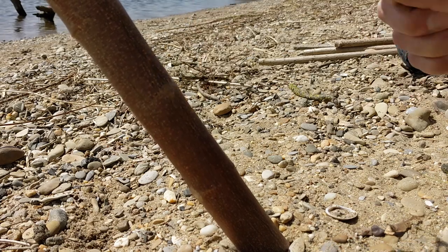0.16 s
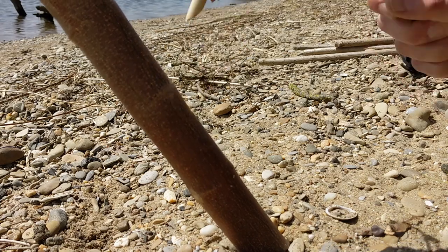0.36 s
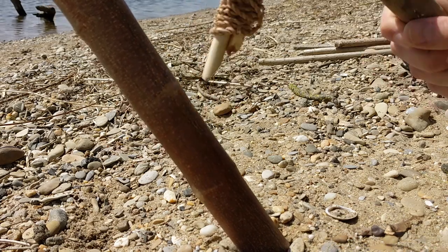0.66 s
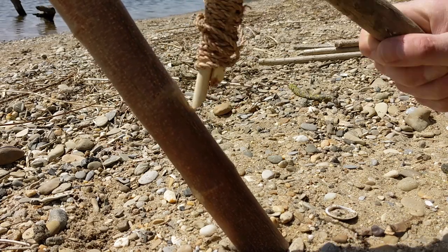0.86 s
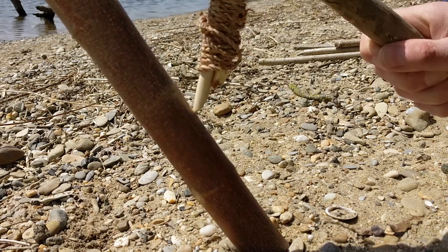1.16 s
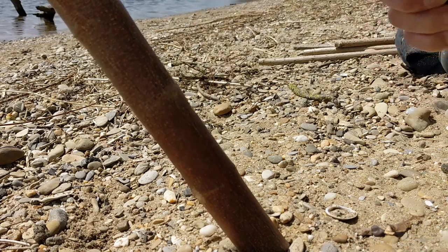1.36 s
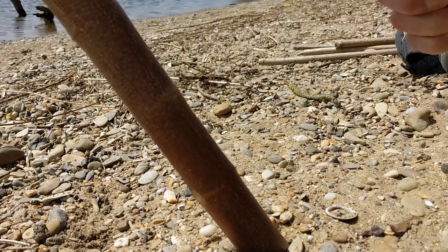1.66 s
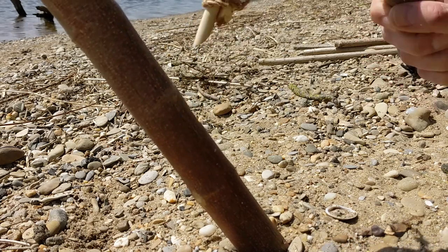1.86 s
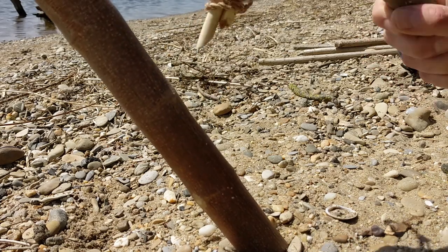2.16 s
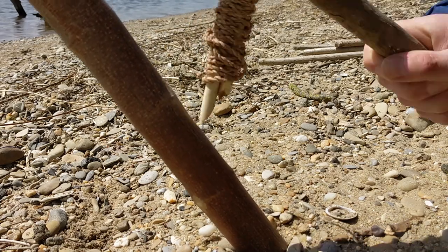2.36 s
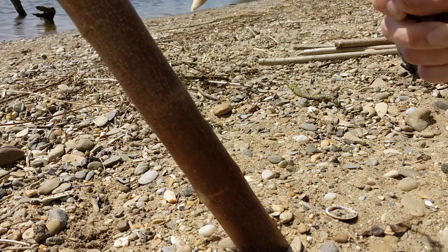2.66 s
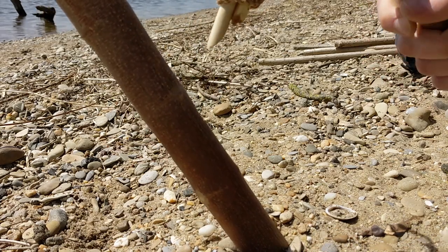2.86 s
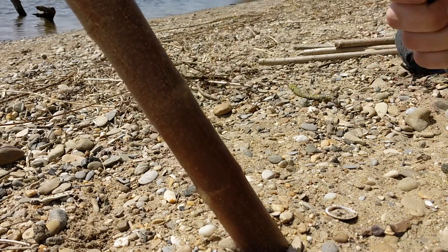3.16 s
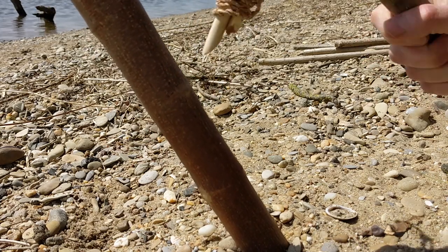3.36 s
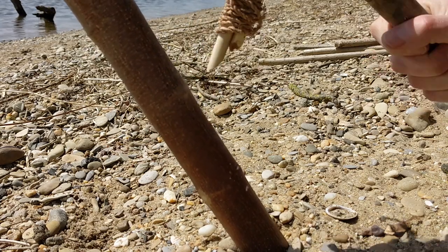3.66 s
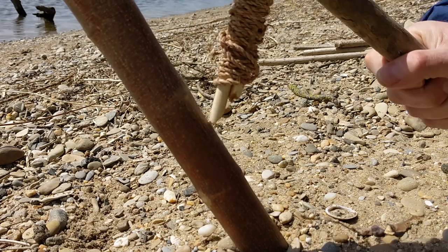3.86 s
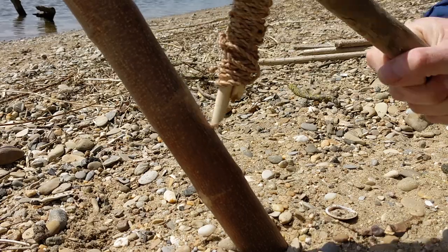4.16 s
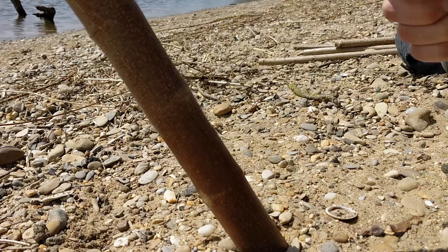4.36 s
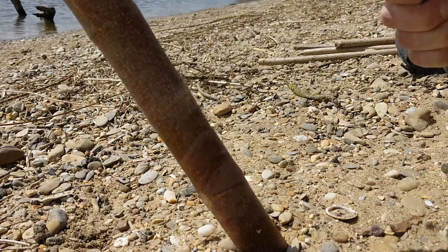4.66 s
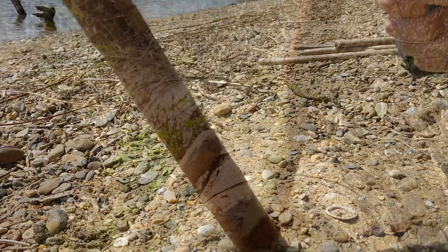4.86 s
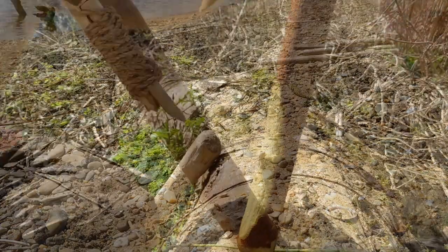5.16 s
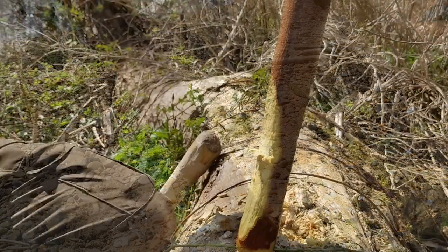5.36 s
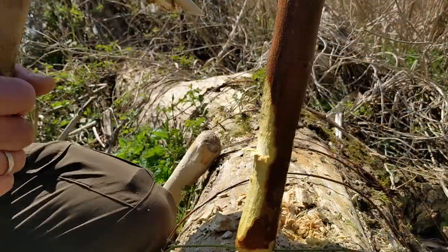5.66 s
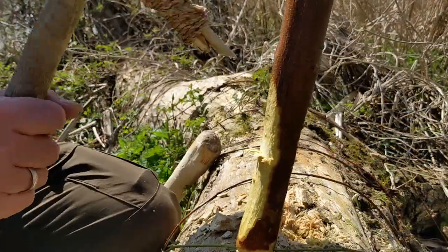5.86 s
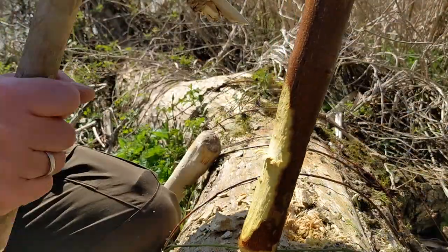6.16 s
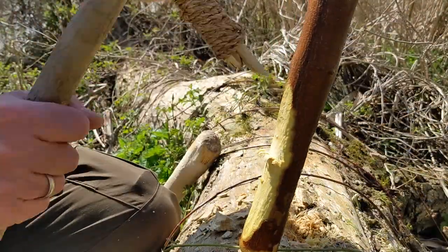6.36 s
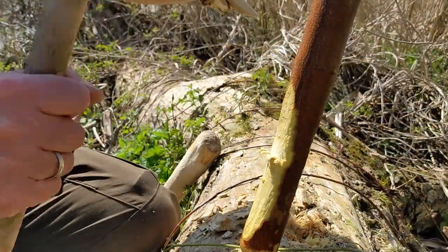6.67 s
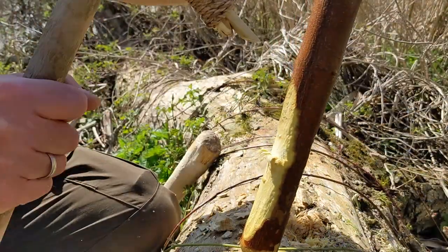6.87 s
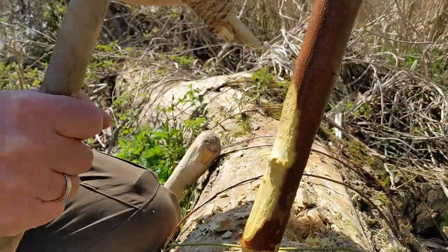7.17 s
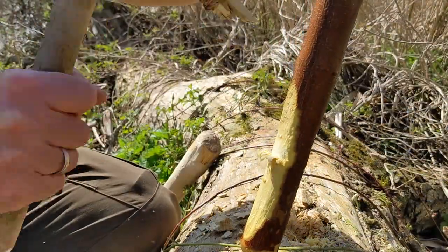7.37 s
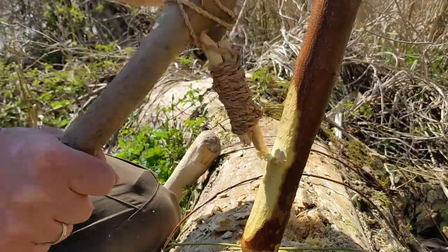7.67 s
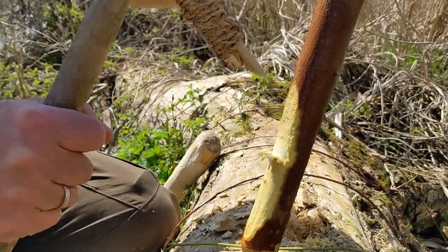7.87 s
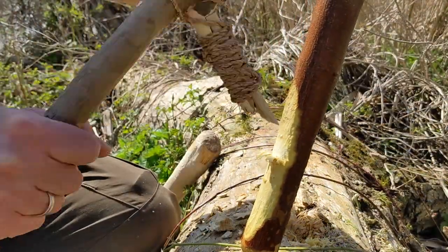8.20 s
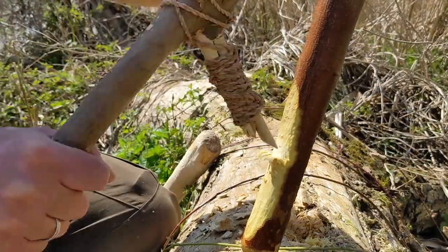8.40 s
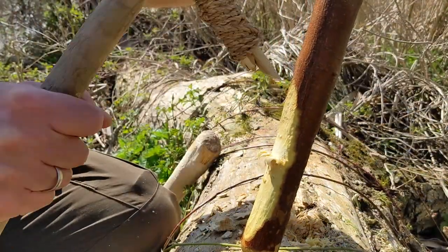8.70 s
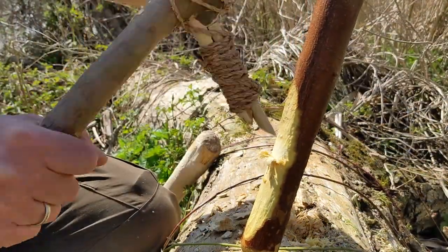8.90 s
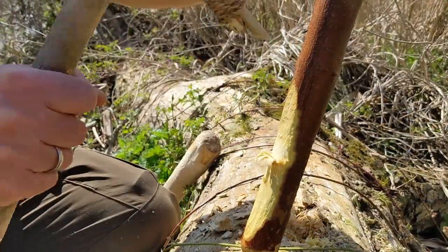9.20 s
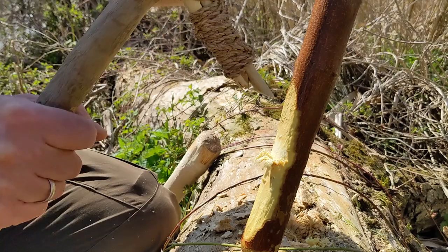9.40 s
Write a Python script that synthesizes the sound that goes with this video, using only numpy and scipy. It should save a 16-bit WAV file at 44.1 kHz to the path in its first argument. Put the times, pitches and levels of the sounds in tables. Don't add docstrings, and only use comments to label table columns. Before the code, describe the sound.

Dry, sharp adze blows on wood, heard very near in open air. First eight, a short gap with small clicks and handling rustle, then eight more, varying from dull to snappy, with bright pebble tings. A thin lull carries faint bird whistles; then fuller knocking blows come about four per second to the end, over faint wind and an almost inaudible insect drone. Little reverberation, slight stereo width.

```python
import sys
import numpy as np
from scipy import signal
from scipy.fft import rfft, irfft, next_fast_len
from scipy.io import wavfile
from scipy.ndimage import uniform_filter1d

SR = 44100
rng = np.random.default_rng(int(sys.argv[2]) if len(sys.argv) > 2 else 0)


def wav_record(signal):
    frames = np.transpose(np.atleast_2d(signal))
    bounded = np.clip(frames, -1, 1)
    quanta = np.round(bounded * 32767).astype(np.int16)
    wavfile.write(sys.argv[1], SR, quanta)


def voltage_ratio(level):
    return 10 ** (np.asarray(level, float) / 20)


N = 420713
SPAN, LEAD = 8192, 1024
TIME = (np.arange(SPAN) - LEAD) / SR
SCRUB_S = 5.0


def curve(points, count):
    hz, value = np.transpose(points)
    return np.interp(np.log(np.fft.rfftfreq(count, 1 / SR) + 1), np.log(hz + 1), value)


def colour(x, points):
    count = x.shape[-1]
    cepstrum = irfft(np.log(voltage_ratio(curve(points, count))), count)
    cepstrum[1:count // 2] *= 2
    cepstrum[count // 2 + 1:] = 0
    return irfft(rfft(x) * np.exp(rfft(cepstrum)), count)


def highpass(x, order, hz):
    return signal.sosfilt(signal.butter(order, hz, "high", fs=SR, output="sos"), x)


def ports(pair, sides):
    gain_db = np.array([[.5], [-.5]]) * curve(sides, SPAN)
    return irfft(rfft(pair) * voltage_ratio(gain_db), SPAN)


def peak(pair, db):
    return pair * voltage_ratio(db) / np.abs(pair.mean(axis=0)).max()


def swell(at_s, rise_s, fall_s):
    return np.exp(np.where(TIME < at_s, (TIME - at_s) / rise_s, (at_s - TIME) / fall_s))


def smooth_noise(x, size):
    return uniform_filter1d(x, size=size) * np.sqrt(size)


def walk(rate_hz):
    hold = int(SR / rate_hz)
    steps = np.repeat(rng.standard_normal(N // hold + 1), hold)
    return 1.3 * uniform_filter1d(uniform_filter1d(steps, hold), hold)[:N]


def ring(push, modes, detune, turn_rad):
    t, axis_hz, drive = np.arange(SPAN) / SR, np.fft.rfftfreq(SPAN, 1 / SR), rfft(push)
    power = np.atleast_2d(np.abs(drive) ** 2).mean(axis=0)
    body = 0
    for (mode_hz, db, t60_s), shift, turn in zip(modes, detune, turn_rad):
        hz = mode_hz * (1 + shift)
        offset = (axis_hz - hz) * t60_s * 2 * np.pi / np.log(1000)
        seen = np.sqrt(np.average(power, weights=1 / (1 + offset ** 2) ** 2))
        phase = 2 * np.pi * hz * t + np.array([[turn], [-turn]])
        body = body + voltage_ratio(db - 60 * t / t60_s) / seen * np.sin(phase)
    return irfft(drive * rfft(body), SPAN)


def late_lows(x, cycles):
    hz = np.clip(np.fft.rfftfreq(SPAN, 1 / SR), 40, 1500)
    return irfft(rfft(x) * np.exp(-2j * np.pi * cycles * (np.log(hz) - hz / 1500)), SPAN)


def add(out, pair, s):
    at = int(s * SR) - LEAD
    lo, hi = max(at, 0), min(at + SPAN, N)
    out[:, lo:hi] += (pair * signal.windows.tukey(SPAN, .15))[:, lo - at:hi - at]


def chop_on_shore(out):
    # knock_db, body_db, treble_db
    loose_blows = [(0.2653, -12.5, -9, -21, 1), (0.561, -17.5, -14.5, -18.5, 6.5),
                   (0.9015, -18, -1.5, -10, 6.5), (1.1991, -8.5, -12, -22.5, -2),
                   (1.4996, -7.5, -10.5, -19, 4), (1.7918, -4.5, -17.5, -21.5, -2),
                   (2.0832, -17, -4.5, -5, 9.5), (2.378, -8.5, -34.5, -14, 4)]
    pressed_blows = [(3.3009, -13, -31, -7.5, 3.5), (3.5968, -19, -14, -25, 9),
                     (3.8938, -9, -34, -10.5, 4.5), (4.1875, -7.5, -18, -14, 2.5),
                     (4.4734, -8, -9.5, -11.5, 4.5), (4.771, -11.5, -11, -5, 5.5),
                     (5.0645, -19, -3.5, -5.5, 8), (5.3557, -23, -24, -12, 5)]
    # bite_s, upper_crack_db (beside the blade's note), upper_knock_db
    loose_cuts = [(0.006, -9, 2), (0.0038, -7, -1), (0.0038, -8.5, 1), (0.0041, -6, 2), (0.0021, 0, -1.5),
                  (0.0025, -12.5, 8.5), (0.0054, -5, -2.5), (0.0044, -3.5, 1.5)]
    pressed_cuts = [(.0028, -9.5, -17), (.0048, 2, 10.5), (.0028, 1.5, -7), (.0028, 0.5, -0.5),
                    (.0028, 3.5, 0.5), (.0028, 1, 0.5), (.0028, -1.5, -6), (.0028, -5, 2)]
    # peak_ms (after touch), level_db, crackle_tilt_db
    loose_notes = [(3.6, -18.5, 1.8), (9.4, -25.5, 3.5), (8.2, -19, 2.5), (5.9, -15.5, 0.2),
                   (5.2, -15, 0.5), (6.5, -11, -2), (6.5, -17, 3.5), (3.9, -11.5, -4)]
    pressed_notes = [(5.4, -18, 1), (7.6, -23, 4), (5.6, -16.5, -1.5), (6.9, -16.5, -6.5), (4.2, -22.5, -2),
                     (4.9, -19.5, 1.9), (4.6, -30, -5), (5.2, -30, -1.5)]
    loose_pitches = [2316, 2206, 2264, 2251, 2346, 2338, 2331, 2383]
    pressed_pitches = [2435, 2325, 2431, 2450, 2362, 2442, 2402, 2433]
    loose_lifts = [.1, .1, 0.09, 0.11, 0.085, .1, .1, .1]
    pressed_lifts = [13.5, -2, -3.5, -1, -1.2, -3, 4, 5]
    # pitch_hz, level_db, t60_s
    modes = [
        [(121, -12.5, 0.24), (154, 7.5, 0.052)],
        [(235, -0.5, 0.052), (294, 1, 0.033), (346, 6, 0.027), (409.4, 13.5, 0.014)],
        [(572, 6.5, 0.021), (782, -1, 0.025), (1140, -6, 0.023), (1280, -5.5, 0.021)],
        [(1416, -13, 0.023), (2030, -5.5, 0.011), (2670, -5, 0.0042), (3370, 5.5, 0.0079), (3620, 3, 0.0078)],
    ]
    # freq_hz, density_db
    treble = [(710, -50.5), (1200, -17.5), (1610, -18.5), (2390, 0), (2750, 4), (3460, -11.5), (4210, -8.5),
              (7270, -9.5), (7930, -12.5), (9440, -15.5), (12800, -22), (14500, -12.5), (16300, -37)]
    # freq_hz, left_minus_right_db
    sides = [(60, -9), (110, 1), (200, -0.5), (380, -0.5), (700, 9.5), (1290, 0.5), (2380, 3), (4400, 4),
             (8120, -6), (15000, -8)]
    loose = dict(thud_db=-9, drag_db=-58.5, drag_s=0.068, brush_db=-21.5, rough=3,
                 lead_rad=0.87, low_db=-3, low_hz=239)
    pressed = dict(thud_db=-14.5, drag_db=-61.5, drag_s=0.063, brush_db=-21, rough=1.9,
                   lead_rad=1.6, low_db=7.5, low_hz=205)
    rebounds = [(0.66, 0)] * 8  # stall_ms, first_over_second_db
    shore = dict(modes=modes, treble=treble, sides=sides, cycles=0.99, hop_db=-39.5, echo_s=0.43, echo_db=-63.5)
    for blow in zip(loose_blows, loose_cuts, loose_notes, loose_pitches, loose_lifts, rebounds):
        chop(out, *blow, **shore, **loose)
    for blow in zip(pressed_blows, pressed_cuts, pressed_notes, pressed_pitches, pressed_lifts, rebounds):
        chop(out, *blow, **shore, **pressed)


def chop_on_log(out):
    # knock_db, body_db, treble_db
    blows = [(6.0307, -9, -3, -17.5, -2), (6.282, -6, -1, -15.5, 2.5), (6.5261, -4, -4, -14.5, 0.5),
             (6.7572, -4, -3.5, -13.5, -0.5), (6.994, -2, -5.5, -13.5, 4), (7.227, -3.5, -2.5, -11.5, 0),
             (7.4588, -5, -3, -10.5, -0.5), (7.6907, -4, -7.5, -12, -1.5), (7.7059, -17, -1.5, -8.5, -3),
             (7.927, -11, -3.5, -9, 10.5), (8.1614, -4.5, -1.5, -9, 2.4), (8.3993, -4.5, -7, -11, 4.5),
             (8.6299, -9.5, -2.5, -4, 1.5), (8.8556, -5.5, -6, -9, -0.5), (9.1, -2.5, -8.5, -13.5, 1),
             (9.338, -6, -5, -10.5, 1.5)]
    # bite_s, upper_crack_db (beside the blade's note), upper_knock_db
    cuts = [(.003, -0.5, -2.5), (.003, -4, -1.5), (.003, 2, 4), (.003, -6.5, 0), (.003, 1.5, 1.5),
            (.003, 0, -1), (.003, -3, 3.5), (.003, -4, -8.5), (.003, -4, 2), (.003, 2, -9.5),
            (.003, -6.5, -4), (.003, -0.5, -2), (.003, -1, -6), (.003, -4.5, 5.5), (.0037, -2.5, 8),
            (.003, 0.5, 1.5)]
    # peak_ms (after touch), level_db, crackle_tilt_db
    notes = [(5.5, -20, -0.2), (5, -13, 3.5), (7.7, -13, -0.5), (4.2, -11, -2.5), (6.3, -13, 1.8),
             (4.8, -14, -6.5), (2.8, -11, -1.5), (5.2, -15, -1), (5.6, -25.5, -4.5), (7.8, -20, 4.5),
             (3.4, -10.5, 2), (4.9, -13, .5), (4.4, -26, 0), (5.2, -15, 0.5), (4.6, -14.5, 0.3),
             (3.2, -13.5, 0)]
    pitches = [2280, 2294, 2285, 2320, 2319, 2357, 2307, 2308, 2400, 2293, 2318, 2309, 2450, 2393, 2346,
               2459]
    lifts = [4, 1.7, 2, 6, -0.55, -3, 1, 1, 1.1, -0.5, 6.5, -0.2, 0.5, -1.3, -1.5, -1.5]
    # stall_ms (after the edge stops), first_over_second_db
    rebounds = [(4.57, 5.5), (3.1, -0.5), (12, -1), (4.33, -2.5), (4.4, -6), (4.4, 4.5), (4.63, 3),
                (4.45, 8), (2.8, 5.5), (4.5, 2), (6.1, -1), (5.67, -5.5), (1.4, -1), (1, -1), (1.8, 1),
                (4.45, 4.5)]
    # pitch_hz, level_db, t60_s
    modes = [
        [(90, -11.5, 0.033), (119.4, 4, 0.15), (187, 3.5, 0.082)],
        [(259, -3.5, 0.012), (270, -6, 0.11), (340, 3.5, 0.02), (351, -2.5, 0.086)],
        [(449, -7.5, 0.02), (647, -4, 0.024), (766, 1.5, 0.025), (1034, -10, 0.015), (1440, -15.5, 0.0075)],
        [(1419, -8, 0.02), (1762, -14.5, 0.03), (2650, -4, 0.0046), (3187, 3, 0.0085), (3852, 1, 0.0066)],
    ]
    # freq_hz, density_db
    treble = [(710, -44.5), (1200, 0), (1700, -12.5), (1960, -15), (2310, -7), (2750, -15.5), (3780, -7.5),
              (5780, -20.5), (6520, -20), (10900, -29), (13500, -31), (15300, -41.5), (16300, -45.5)]
    # freq_hz, left_minus_right_db
    sides = [(60, -1), (110, -4.5), (200, -2.5), (380, 2.5), (700, 0.5), (1290, -2), (2380, 2.5),
             (4400, -0.5), (8120, -2.5), (15000, -3.5)]
    for blow in zip(blows, cuts, notes, pitches, lifts, rebounds):
        chop(out, *blow, modes, treble, sides, cycles=1.05, hop_db=-25, echo_s=0.051, echo_db=-52.5,
             thud_db=-10.5, drag_db=-59, drag_s=0.036, brush_db=-21, rough=0.51,
             lead_rad=0.55, low_db=-3.5, low_hz=241)


def chop(out, blow, cut, note, pitch_hz, lift_db, rebound, modes, treble, sides, cycles, hop_db, echo_s, echo_db,
         thud_db, drag_db, drag_s, brush_db, rough, lead_rad, low_db, low_hz):
    start_s, crack_db, knock_db, body_db, treble_db = blow
    bite_s, upper_db, hollow_db = cut
    peak_ms, note_db, tilt_db = note
    noise = rng.standard_normal((6, SPAN))
    touch = 1 / (1 + np.exp(np.clip(-TIME / .0003, -50, 50)))
    fibres = tear_fibres(noise, touch, bite_s, brush_db)

    crackle = colour(colour(fibres, treble), [(4000, -tilt_db / 2), (12000, tilt_db)])
    sound = peak(ports(highpass(crackle, 2, 3800), sides), crack_db + treble_db)
    blade = ring_blade(fibres, modes[3], lift_db)
    sound = sound + peak(ports(blade, sides), crack_db + upper_db / 2)
    chatter = blade_note(noise[5], touch, pitch_hz, peak_ms, lead_rad)
    sound = sound + peak(ports(chatter, sides), note_db + 0.5)

    push = push_pole(noise[2], touch, bite_s, rebound, rough, hop_db, cycles)
    body = [(low_hz, modes[1][0][1] + low_db, modes[1][0][2])] + modes[1][1:]
    knock = [(hz, db + hollow_db * (hz > 700), t60_s) for hz, db, t60_s in modes[2]]
    thud_level_db = thud_db - 16 + 0.66 * (body_db + 18)
    levels_db = thud_level_db, body_db, knock_db
    for held, lowest, db in zip((modes[0], body, knock), modes, levels_db):
        wood = ring_pole(push, held, lowest[0][0])
        sound = sound + peak(ports(wood, sides), crack_db + db)

    drag_level_db = drag_db - 4 + 0.25 * (crack_db + treble_db + 9.5)
    sound = sound + voltage_ratio(drag_level_db) * scrape_free(noise, bite_s, drag_s)
    sound = sound + voltage_ratio(crack_db + echo_db) * echo(noise[4:], echo_s)
    add(out, sound, start_s)


def tear_fibres(noise, touch, bite_s, brush_db):
    grain_db = 4.9 * noise[3] + 4 * smooth_noise(noise[5], 16)
    snaps = (noise[:2] + .5 * noise[2]) * voltage_ratio(grain_db)
    bite = swell(bite_s, 0.32 * bite_s, 0.0035) + 2 * swell(bite_s, bite_s, 0.0012)
    stop = swell(bite_s, 0.00022, 0.0011)
    brush = voltage_ratio(brush_db) * swell(0, 0.0043, .001)
    return snaps * (touch * (bite + stop) + brush)


def ring_blade(fibres, modes, lift_db):
    crack = [(hz, db + lift_db * (hz < 2000), t60_s) for hz, db, t60_s in modes]
    blade = ring(fibres, crack, .008 * rng.standard_normal(6), np.zeros(6))
    return highpass(blade, 2, 450)


def blade_note(noise, touch, pitch_hz, peak_ms, lead_rad):
    waver_rad = 0.42 * smooth_noise(noise, 60)
    tone = np.sin(2 * np.pi * pitch_hz * TIME + waver_rad + lead_rad * np.array([[.5], [-.5]]))
    rise_s, fall_s = .0013, 0.002
    return tone * touch * uniform_filter1d(swell(peak_ms / 1000, rise_s, fall_s), size=60)


def push_pole(noise, touch, bite_s, rebound, rough, hop_db, cycles):
    stall_ms, first_db = rebound
    first = 0.76 * voltage_ratio(first_db) * swell(bite_s - .001, 0.000066, .0001)
    second = swell(bite_s + stall_ms / 1000, 0.00021, 0.00044)
    hop_s = bite_s + 0.013 + 0.0042 * rng.standard_normal()
    hop = voltage_ratio(hop_db) * swell(hop_s, 0.00042, 0.0089)
    return late_lows((1 + rough * noise) * touch * (first + second + hop), cycles)


def ring_pole(push, modes, lowest_hz):
    wood = ring(push, modes, .012 * rng.standard_normal(6), .3 * rng.standard_normal(6))
    return highpass(wood, 4, .7 * lowest_hz)


def scrape_free(noise, bite_s, drag_s):
    # freq_hz, density_db
    drag = [(470, -34.5), (800, -3.5), (4460, -4), (4740, 0.5), (5800, -12.5), (6910, 0.5), (10600, -13),
            (14500, -5), (16000, -16)]
    release = 1 + np.exp((TIME - bite_s - drag_s) / 0.017)
    scrape = 4.6 * swell(bite_s + 0.012, 0.0026, .55 * drag_s) / release
    hiss = colour(noise[4:] * voltage_ratio(7.5 * smooth_noise(noise[3], 60)), drag)
    return scrape * hiss / hiss.std()


def echo(noise, echo_s):
    dull = colour(noise, [(300, -31.5), (780, -2.5), (1500, -11.5), (2400, -2.0), (3300, -7),
                          (8000, -19.0), (16000, -49.5)])
    return swell(echo_s, 0.016, 0.016) * dull / dull.std()


def skids(out):
    # start_s, length_s, level_db
    glances = [
        (0.276, 0.024, -35.5),
        (0.564, 0.059, -32),
        (5.198, 0.033, -53),
        (5.603, 0.05, -57),
        (5.846, 0.017, -56),
        (7.716, 0.029, -31),
    ]
    # freq_hz, density_db
    bark = [(200, -33), (800, -3), (1500, 9.5), (2400, 2.5), (4200, -3.5), (7000, -13.5), (16000, -25),
            (17000, -38)]
    for start_s, length_s, db in glances:
        noise = rng.standard_normal((3, SPAN))
        share = np.clip(TIME / length_s, 0, 1)
        rub = colour(noise[:2] * voltage_ratio(4.5 * smooth_noise(noise[2], 40)), bark)
        add(out, voltage_ratio(db) * share ** 0.37 * (1 - share) ** 1.5 * rub / rub.std(), start_s)


def ticks(out):
    # start_s, peak_db, centre_hz, left_minus_right_db
    chips = [(0.039, -50, 2920, 2), (0.1889, -46, 2830, 7), (0.821, -49, 6640, -1),
             (0.9571, -47.5, 14000, 0), (1.5341, -35.5, 2600, -2), (1.6535, -45.5, 6650, -3.5),
             (1.669, -43.5, 13400, 2), (1.818, -21.5, 6500, 2), (2.5021, -47.5, 15000, -15),
             (2.5296, -33, 14300, -6.5), (2.5515, -48, 14560, -6), (2.5907, -42, 6930, -6.5),
             (2.626, -44, 6900, -2), (2.654, -41, 6900, -2), (2.662, -43, 9000, -4), (2.711, -45, 6000, -1),
             (2.7165, -42, 7000, 2), (2.7358, -27.5, 6900, 2.5), (2.7506, -43.5, 6910, -3),
             (2.8579, -52, 6920, 2.5), (1.3234, -55, 8650, -4), (1.713, -51, 6870, -2),
             (1.9669, -52, 14200, -2.5), (2.2223, -48.5, 5360, 0), (3.4705, -50, 5700, 1),
             (3.511, -53, 6500, 0), (3.7683, -50, 11600, -5), (4.0627, -53, 12200, 0),
             (2.8859, -43, 7100, -3), (3.0568, -48.5, 6830, 10), (3.2316, -27, 13500, 5),
             (3.6859, -45, 6650, -3), (3.869, -50.5, 3370, -1.5), (3.9592, -41.5, 6970, -11),
             (4.092, -51, 3280, 4), (4.3442, -35.5, 8700, -2.5), (4.4062, -36.5, 14600, -8.5),
             (4.4213, -47.5, 13800, -9), (4.9156, -45, 11800, 13), (5.29, -56, 9000, 0),
             (5.4326, -43, 12900, 9), (6.8991, -40.5, 12430, 7), (7.7246, -40, 2870, 4),
             (8.6444, -28.5, 4000, -3), (8.8702, -24, 3100, -10)]
    for start_s, db, hz, pan_db in chips:
        fall_s = np.clip(6 / hz, .0004, .0012)
        grain = rng.standard_normal((2, SPAN)) * swell(.001, .0002, fall_s)
        tone = colour(grain, [(hz / 30, -50), (hz / 8, -22), (hz / 2, -7), (hz, 0), (16400, -7)])
        add(out, peak(tone * voltage_ratio(np.array([[pan_db], [-pan_db]]) / 2), db), start_s)


def pebbles_and_bumps(out):
    # start_s, pitch_hz, level_db, t60_s
    pebbles = [(.272, 6900, -46, .05), (1.505, 6900, -42, .04), (2.383, 4850, -37, .14),
               (2.385, 6800, -24, .04), (2.385, 14500, -36, .07), (3.9, 4850, -45, .09),
               (3.9, 6900, -44, .04), (4.19, 4850, -45, .11), (4.775, 4850, -47, .09),
               (5.068, 4850, -52, .15), (5.36, 4850, -63, .1)]
    # start_s, pitch_hz, level_db, t60_s
    bumps = [
        (.062, 152, -45.5, 0.064),
        (.064, 254, -49, 0.043),
        (0.613, 190, -39, 0.057),
        (2.525, 135, -43.5, 0.13),
        (2.527, 221, -57, 0.043),
    ]
    for start_s, hz, db, t60_s in pebbles + bumps:
        decay = voltage_ratio(db - 60 * np.abs(TIME) / t60_s) * (TIME > 0)
        add(out, decay * np.sin(2 * np.pi * hz * TIME) * np.ones((2, 1)), start_s)


def air_layer(points, level_db, flicker_db, rate_hz, grain_db, alike):
    noise = rng.standard_normal((4, next_fast_len(N // 2 + 1) * 2))
    pair = noise[:2] + alike * noise[:2].sum(axis=0)
    layer = colour(pair * voltage_ratio(grain_db * noise[2:]), points)[:, :N]
    return layer / layer.mean(axis=0).std() * voltage_ratio(level_db + flicker_db * walk(rate_hz))


def hands():
    # start_s, hold_s, level_db
    shifts = [(0, 0.002, -61), (1.693, .02, -84), (2.137, 0.053, -70.5), (2.37, 0.019, -63.5),
              (2.564, 0.022, -67.5), (2.619, 0.031, -55.5), (2.737, 0.014, -54.5), (2.876, 0.024, -67.5),
              (3.093, 0.041, -71.5), (3.335, 0.074, -65.5), (5.004, 0.26, -68), (5.325, 0.18, -68),
              (5.604, 0.15, -65), (5.836, 0.11, -67), (7.003, 0.3, -77), (8.297, 0.084, -88),
              (6.109, 7.9, -75)]
    # freq_hz, density_db
    rustle = [(450, -40), (1000, -4), (1410, -3.5), (1820, -12), (2140, -2.5), (3780, -5.5), (5300, -10),
              (6960, -5), (8280, -7), (11100, -9.5), (14500, -6), (15300, -6.5), (16300, -30.5)]
    t = np.arange(N) / SR
    rise_db_s, fall_db_s = 200, 330
    power = voltage_ratio(2 * -77)
    for start_s, hold_s, db in shifts:
        rise_db = rise_db_s * np.clip(start_s - t, 0, 1)
        fall_db = fall_db_s * np.clip(t - start_s - hold_s, 0, 9)
        power = power + voltage_ratio(2 * (db - rise_db - fall_db))
    return air_layer(rustle, 10 * np.log10(power), flicker_db=2.1, rate_hz=70, grain_db=5.5, alike=.1)


def shingle():
    # freq_hz, density_db
    stones = [(880, -49), (1500, -15.5), (2060, -19.5), (2770, -5.5), (4330, -5), (5710, -10), (6960, -2.5),
              (9850, -19), (16000, -12)]
    t = np.arange(N) / SR
    noise = rng.standard_normal((4, next_fast_len(N // 2 + 1) * 2))
    layer = colour(noise[:2] * voltage_ratio(3.8 * noise[2:]), stones)[:, :N]
    fade_db = 20 * np.clip(t - 4.6, 0, 9)
    return layer / layer.std() * voltage_ratio(-77 + 1.6 * walk(9.4) + 4 * walk(84) - fade_db)


def breeze():
    # time_s, level_db
    gusts = [(0.0, -64.5), (0.72, -57), (0.95, -66), (1.33, -63), (3.19, -62.5), (3.37, -62.5), (4.86, -69),
             (5.0, -58.5), (5.47, -60), (6.99, -56), (7.62, -50.5), (8.18, -55), (9.03, -57), (9.33, -49),
             (9.54, -60)]
    # freq_hz, density_db
    rumble = [(12, -46.5), (20, -20), (67, 5.5), (97, 3), (179, -5), (258, -11.5), (400, -14.5),
              (520, -43.5), (880, -120)]
    level_db = np.interp(np.arange(N) / SR, *np.transpose(gusts))
    return air_layer(rumble, level_db, flicker_db=3.5, rate_hz=25, grain_db=.1, alike=.4)


def water():
    # freq_hz, density_db
    wash = [(120, -33), (200, -2), (264, -9.5), (490, -4), (925, -12.5), (1360, -18), (1590, -27.5),
            (2000, -23.5), (2600, -50), (4400, -120)]
    return air_layer(wash, -69, flicker_db=1.5, rate_hz=30, grain_db=1.5, alike=.5)


def birds(out):
    # start_s, end_s, start_hz, end_hz, level_db
    calls = [
        (5.02, 5.06, 2190, 2280, -76),
        (5.36, 5.48, 2340, 2230, -68),
        (5.63, 5.67, 2200, 2320, -67),
        (5.65, 5.775, 2320, 2330, -63.5),
        (5.605, 5.645, 690, 680, -65),
        (5.605, 5.645, 1400, 1380, -67),
        (5.6, 5.625, 2450, 2350, -67),
        (5.855, 5.88, 4350, 4280, -67),
        (5.935, 5.97, 5300, 4860, -68),
        (6.069, 6.098, 5200, 4880, -66),
    ]
    for start_s, end_s, start_hz, end_hz, db in calls:
        share = np.clip(TIME / (end_s - start_s), 0, 1)
        tone = np.sin(2 * np.pi * np.cumsum(start_hz + (end_hz - start_hz) * share) / SR)
        add(out, voltage_ratio(db) * np.sqrt(np.sin(np.pi * share) + 1e-18) * tone * np.ones((2, 1)), start_s)


def drone():
    t = np.arange(N) / SR
    tone = np.sin(2 * np.pi * np.cumsum(455 * (1 + .02 * walk(12))) / SR)
    return tone * voltage_ratio(-72 + 4 * walk(8)) * np.clip(t - SCRUB_S, 0, 1)


def scene():
    out = np.zeros((2, N))
    chop_on_shore(out)
    chop_on_log(out)
    skids(out)
    ticks(out)
    pebbles_and_bumps(out)
    birds(out)
    return out + hands() + shingle() + breeze() + water() + drone()


def roll_off(x):
    return signal.sosfilt(signal.butter(12, 16490, fs=SR, output="sos"), x)


def record(dry):
    rounded = np.tanh(dry) / np.tanh(1.3)
    thin = highpass(rounded, 2, 46)
    mix = signal.sosfilt(signal.ellip(10, .2, 85, 16100, fs=SR, output="sos"), thin)
    return roll_off(mix)


dry = scene()
out = record(dry)
wav_record(out)
```